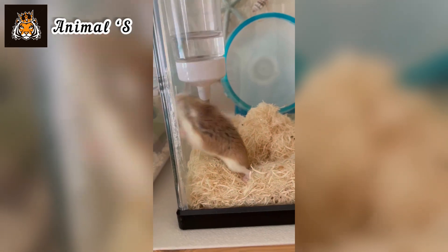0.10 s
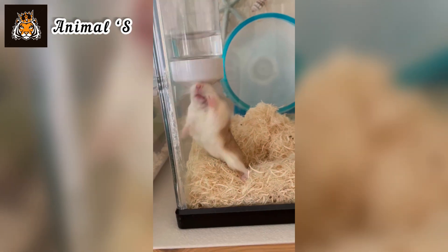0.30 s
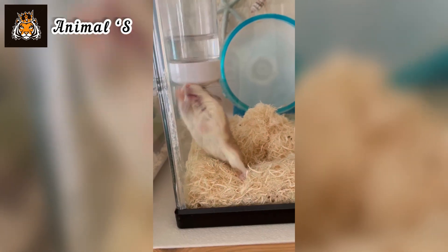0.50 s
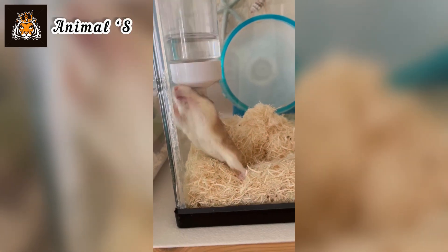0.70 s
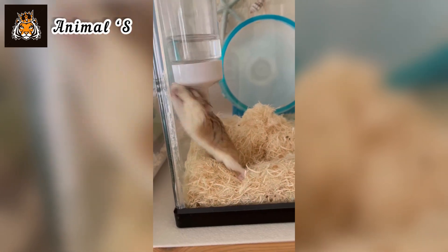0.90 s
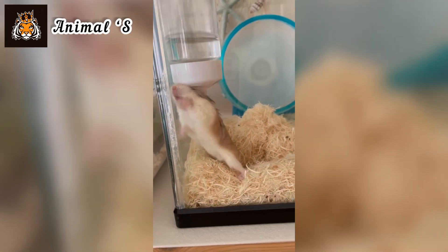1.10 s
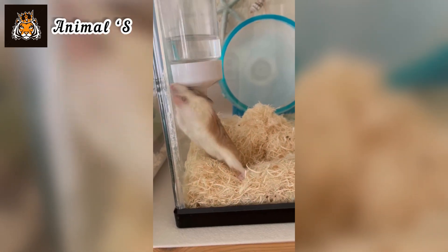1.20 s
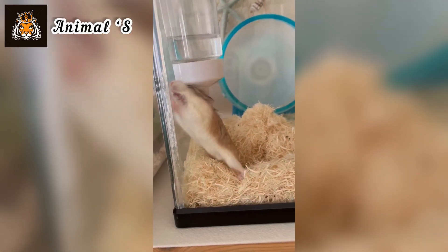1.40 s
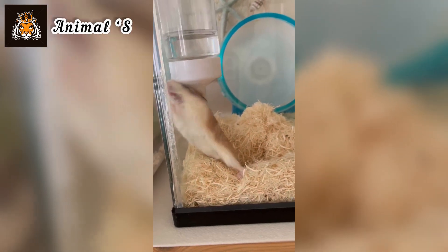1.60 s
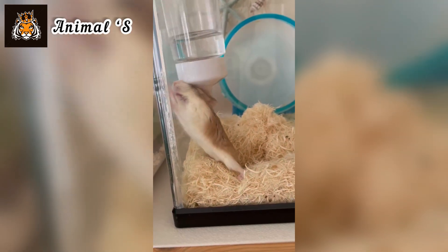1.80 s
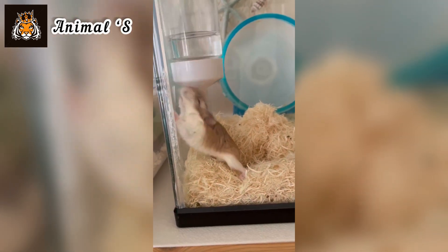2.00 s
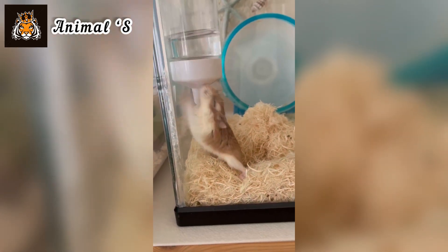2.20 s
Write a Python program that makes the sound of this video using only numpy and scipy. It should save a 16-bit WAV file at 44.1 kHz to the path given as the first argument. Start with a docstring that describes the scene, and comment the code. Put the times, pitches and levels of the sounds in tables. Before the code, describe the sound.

Hollow knocks of a hamster's water bottle on glass, with small claw clicks and crackling shavings

```python
"""A hamster stands at the water bottle in a glass tank, close to the microphone in a small quiet room.
A low hum and rumble lie beneath throughout. After a faint crackle of wood shavings and a tiny click,
paws tap the wall and the bottle knocks loudest, ringing the pane and booming through the tank.
Weaker knocks follow after one second and towards the end; between them come lighter taps, clicks of
claws and spout, and crackling shavings. Ringing modes make knocks and taps; shaped noise the rest."""
import sys
import numpy as np
from scipy import signal
from scipy.fft import rfft, irfft
from scipy.io import wavfile

SR = 44100
rng = np.random.default_rng(int(sys.argv[2]) if len(sys.argv) > 2 else 0)


def bounce(signal):
    """Save signal as a 16-bit WAV file at the path given by the first command-line argument."""
    frames = np.transpose(np.atleast_2d(signal))
    limited = np.clip(frames, -1, 1)
    pcm = np.round(limited * 32767).astype(np.int16)
    wavfile.write(sys.argv[1], SR, pcm)


N = 97020
T = np.arange(N) / SR
FREQ = np.maximum(np.arange(N + 1) * SR / (2 * N), 1)  # Hz, for spectra of 2 N samples
LEFT_RIGHT = np.array([[1], [-1]])  # a side signal is opposite in the two channels


def undb(db):
    """Decibels to gain."""
    return 10 ** (np.asarray(db) / 20)


def peak(x):
    """Scale to a peak of 1."""
    return x / np.abs(x).max()


def unit(x):
    """Scale to an rms of 1."""
    return x / x.std()


def noise():
    """White noise."""
    return rng.standard_normal(N)


def decay_db(t60_s):
    """Steady fade in dB, reaching -60 after t60_s."""
    return -60 * T / t60_s


def curve(points):
    """Levels in dB at every frequency, from (Hz, dB) points joined on a log frequency axis."""
    hz, db = np.array(points, float).T
    return np.interp(np.log(FREQ), np.log(hz), db)


def through(x, response):
    """Filter by a frequency response."""
    return irfft(rfft(x, 2 * N) * response)[..., :N]


def colour(x, db):
    """Causal minimum-phase filter with the given level at every frequency."""
    cepstrum = irfft(np.log(undb(db)))
    # folding the cepstrum forward in time makes the filter causal
    cepstrum[1:N] *= 2
    cepstrum[N + 1:] = 0
    return through(x, np.exp(rfft(cepstrum)))


def soften(x, hz):
    """Two-pole low-pass."""
    b, a = signal.butter(2, hz, fs=SR)
    return signal.lfilter(b, a, x + 1e-18)  # the tiny offset avoids slow denormal numbers


def ring(modes):
    """Free ringing of (Hz, dB, t60) modes: a sum of decaying sines."""
    return sum(undb(db) * np.sin(2 * np.pi * hz * T) * undb(decay_db(t60)) for hz, db, t60 in modes)


def add(out, start_s, x):
    """Mix a sound in from its start time."""
    i = int(start_s * SR)
    out[i:] += x[:N - i]


def bottle_knocks():
    """A knock rings the pane, whose low bending waves arrive last, and makes the whole tank boom."""
    # knocks of the bottle: start_s, level_db, contact_cutoff_hz, damping by the leaning body [dB per s]
    knocks = [(0.2029, -5, 6950, 12), (0.2512, -23, 7040, 23), (0.2956, -26, 1300, 71),
              (1.0252, -16.5, 4000, 16), (1.069, -19, 227, 54), (1.5353, -20, 3470, 38),
              (1.9053, -19, 3500, 26), (1.976, -32.5, 1000, 26)]
    # deepest strong note of the pane, before the low cut: pitch_hz, level_db, t60_s
    deep_note = (173, -5.5, .41)
    # other modes of bottle and pane, before the body damps them: pitch_hz, level_db, t60_s
    pane_modes = [(133, -16.5, 0.56), (190.1, -1, 0.23), (230.5, -18, 0.42), (322.6, -14, 0.24),
                  (373, -22.5, 0.37), (363, 0.5, 0.033), (438, -16, 0.16), (493, -24.5, 0.19),
                  (531.6, -16, 0.12), (620, 3, 0.0091), (671, -13, 0.04), (765, -19.5, 0.13),
                  (839, -22, 0.16), (1648, -18.5, 0.054), (2204, -14.5, 0.013), (2373, -24, 0.042)]
    # how well the pane radiates the upper notes: freq_hz, level_db
    radiation = [(950, 5), (1350, -7.5), (1900, 2.5), (2400, -1), (3200, -7.5), (4200, -8), (8000, -28)]
    # boom of the tank's many weak, crowded modes: freq_hz, level [dB per Hz]
    boom_spectrum = [(70, -25.5), (140, -2), (260, -4.5), (800, -9.5), (1300, -18.5), (3000, -54)]
    boom_db, boom_rise_s, boom_t60_s = -19, .012, 0.25
    bend_delay_s = 0.002217  # at 1 kHz, longer for lower notes

    low_cut = signal.butter(4, 205, "high", fs=SR, output="sos")  # Hz; the pane radiates little bass
    bend = np.exp(-4j * np.pi * bend_delay_s * np.sqrt(1000 * FREQ))
    swell = undb(boom_db + decay_db(boom_t60_s)) * np.minimum(T / boom_rise_s, 1)
    out = np.zeros(N)
    for start_s, db, cutoff_hz, damping in knocks:
        ringing = ring(vary_blow([deep_note] + pane_modes))
        radiated = colour(signal.sosfilt(low_cut, ringing), curve(radiation))
        blow = -peak(through(radiated, bend))
        boom = swell * unit(through(noise(), undb(curve(boom_spectrum))))
        add(out, start_s, undb(db - damping * T) * soften(blow + boom, cutoff_hz))
    return out


def vary_blow(modes):
    """The same modes, a little shifted in pitch and level by where the blow lands."""
    detune_share, scatter_db = .009, 1.5
    chance = rng.standard_normal((len(modes), 2))
    return [(hz * (1 + detune_share * a), db + scatter_db * b, t60)
            for (hz, db, t60), (a, b) in zip(modes, chance)]


def paw_taps():
    """A tap rings the wall with random mode polarities and scuffs it; each has its own pitch band."""
    # paw taps: start_s, rms_db of the first 20 ms, centre_hz, reach either side [octaves], scuff_db
    taps = [(0.1952, -33.5, 1066, 2.35, 13.5), (0.2046, -28, 1390, 1.43, 3.5), (.213, -27.5, 788, 0.3, 24),
            (.252, -31.5, 890, 1.11, 7), (0.2982, -43, 477, 0.73, -10), (0.4489, -43.5, 397, 1.12, 2),
            (.459, -39, 168, 0.89, 11), (0.477, -42.5, 173, 0.71, 16.5), (0.67, -44, 620, 1.66, -9),
            (0.9177, -52, 980, 0.52, 6), (0.995, -43, 540, 1.58, -2), (1.241, -57.5, 420, 2, 1),
            (1.394, -60, 830, 0.5, 12), (1.517, -47.5, 620, 0.87, -5), (1.634, -46.5, 733, 0.84, 11),
            (1.784, -59, 830, 0.26, 1), (1.838, -39.5, 550, 1.6, -2), (2.002, -43, 756, 0.71, 5),
            (2.026, -45, 760, 0.58, -3), (2.044, -48.5, 303, 1.27, 14), (2.184, -48.5, 289, 1.04, 6)]
    # modes of the tapped wall, before each tap's band and level: pitch_hz, level_db, t60_s
    wall_modes = [(132, -3.5, 0.61), (175.3, 5, 0.3), (231.8, -2, 0.26), (332.5, 7, 0.091),
                  (409.3, 6.5, 0.13), (500, 4.5, 0.15), (667.3, 2.5, 0.046), (720.6, 4.5, 0.074),
                  (941.5, 0.5, 0.088), (1142, 4.5, 0.07), (1296, -10.5, 0.22), (1610, -4, 0.088),
                  (2550, -13, .08)]
    contact_db, contact_t60_s = 4, 0.032  # the first touch
    scuff_t60_s, scuff_cutoff_hz = 0.1, 1296

    modes = np.array([ring([mode]) for mode in wall_modes])
    out = np.zeros(N)
    for start_s, db, centre_hz, octaves, scuff_db in taps:
        wall = rng.choice([-1, 1], len(modes)) @ modes
        contact = undb(contact_db + decay_db(contact_t60_s))
        scuff = undb(scuff_db + decay_db(scuff_t60_s))
        struck = wall + (contact + scuff) * unit(soften(noise(), scuff_cutoff_hz))
        edges_hz = [centre_hz / 2 ** octaves, centre_hz * 2 ** octaves]
        tap = signal.sosfilt(signal.butter(3, edges_hz, "band", fs=SR, output="sos"), struck)
        add(out, start_s, undb(db) * tap / tap[T < .02].std())
    return out


def claw_and_spout_clicks():
    """Hard little contacts, each a bright burst of noise that dies within milliseconds."""
    # sharp clicks of claws and spout: start_s, peak_db
    click_list = [(0.138, -62.5), (.2055, -25), (0.2516, -34.5), (0.6453, -57.5), (1.027, -47),
                  (1.234, -45.5), (1.336, -55.5), (1.566, -46), (1.7027, -56), (1.7255, -52), (1.9376, -41)]
    low_cut_hz, top_cut_hz, t60_s = 3000, 7500, 0.012

    b, a = signal.butter(2, low_cut_hz, "high", fs=SR)
    out = np.zeros(N)
    for start_s, db in click_list:
        bright = soften(signal.lfilter(b, a, noise()), top_cut_hz)
        add(out, start_s, undb(db) * peak(bright * undb(decay_db(t60_s))))
    return out


def shavings():
    """Each shift of weight lets off a short shower of snaps with its own colour, left and right."""
    # crackles in the shavings: start_s, level_db, decay to 1/e [s], dull part against crisp [dB]
    crackles = [(.118, -77, 0.059, -6), (0.2003, -42, 0.027, -24), (0.262, -41.5, .026, 1),
                (0.448, -71, 0.017, 8.5), (.51, -89.5, 0.24, 0), (0.673, -60, 0.032, -2),
                (.722, -67, 0.021, 2), (.802, -64, 0.027, 6), (.821, -67.5, .0085, 6.5),
                (0.879, -70, 0.0075, 3), (.973, -72, 0.015, 8), (1, -60.5, 0.029, 1.5),
                (1.027, -55, 0.033, -3), (1.067, -60.5, 0.039, 7.5), (1.229, -55.5, 0.032, 7.5),
                (1.334, -62.5, 0.023, 2), (1.388, -63.5, 0.0082, 7.5), (1.492, -73, 0.044, 9),
                (1.538, -58.5, .015, 2.5), (1.56, -60.5, 0.041, 2.5), (1.719, -65, 0.023, .5),
                (1.741, -66.5, 0.016, 5), (1.779, -78, .014, 17.5), (1.824, -64.5, 0.036, 7),
                (1.841, -56, 0.016, 0), (1.904, -57, 0.042, 2), (1.93, -60.5, 0.037, -5)]
    # crisp part of a crackle: freq_hz, level [dB per Hz]
    crisp_spectrum = [(1000, -15.5), (2500, 4.5), (3900, -0.5), (4700, 0), (5500, 6.5), (6500, -5),
                      (8500, 0.5), (12500, -5.5), (15000, -13.5)]
    # dull part of a crackle: freq_hz, level [dB per Hz]
    dull_spectrum = [(300, 5), (700, 6), (1400, 3), (2500, 1), (4000, 0), (8000, -49)]
    side_db, rise_s = -12.5, 0.0056

    grains = snaps() + undb(side_db) * LEFT_RIGHT * snaps()
    crisp = unit(colour(grains, curve(crisp_spectrum)))
    dull = unit(colour(grains, curve(dull_spectrum)))
    out = np.zeros((2, N))
    for start_s, db, decay_s, dull_db in crackles:
        rise = np.clip((T - start_s) / rise_s, 0, 1)
        fade = np.exp(-np.maximum(T - start_s - rise_s, 0) / decay_s)
        out += bend_chips(undb(db) * rise * fade * (crisp + undb(dull_db) * dull))
    return out


def snaps():
    """Dense tiny snaps at random moments, a few of them much stronger."""
    snaps_per_s, spread_db = 3500, 2.5
    polarity = rng.choice([-1, 1], N)
    happens = rng.random(N) < snaps_per_s / SR
    strength = undb(spread_db * np.minimum(rng.exponential(size=N), 4))
    return polarity * happens * strength


def bend_chips(x):
    """Colour a shower with the random peaks and dips of the chips that it bends."""
    scatter_db, spacing_hz = 3, 450
    hz = np.arange(0, SR / 2, spacing_hz)
    gain = undb(np.interp(FREQ, hz, scatter_db * rng.standard_normal(len(hz))))
    return through(x, gain / np.sqrt(np.mean(gain ** 2)))


def room(x):
    """Short diffuse echo of tank and room: coloured noise that fades after a small gap."""
    # colour of the echo: freq_hz, level_db
    echo_colour = [(100, -2), (300, -14), (700, -8.5), (1500, -15.5), (5000, -11.5), (15000, -17.5)]
    t60_s, gap_s = 0.2, 0.0049
    fade = (T > gap_s) * undb(decay_db(t60_s))
    fade = fade / np.sqrt(np.sum(fade ** 2))  # unit energy
    echo = colour(spread(noise() * fade, noise() * fade), curve(echo_colour))
    return x + through(x, rfft(echo, 2 * N))


def spread(mid, side):
    """Left and right: alike in the bass, wider in the treble."""
    # side share of the sound: freq_hz, level_db
    side_share = [(100, -56), (300, -16.5), (700, -3.5), (1500, -6), (5000, -1.5), (15000, -5.5)]
    return mid + LEFT_RIGHT * colour(side, curve(side_share))


def background():
    """Low room rumble of shaped noise, with a faint hum as a steady sine."""
    # spectrum of the rumble: freq_hz, level [dB per Hz]
    rumble_spectrum = [(20, -93), (35, -9.5), (55, -0.5), (90, 1.5), (125, -6), (180, -8), (260, -9.5),
                       (500, -14.5), (900, -22.5), (1600, -32.5), (3000, -37), (4200, -49), (8000, -51.5),
                       (13000, -47.5), (15000, -62)]
    rumble_db, hum_hz, hum_db = -56.5, 86, -64  # rms levels
    rumble = unit(through(spread(noise(), noise()), undb(curve(rumble_spectrum))))
    hum = unit(np.sin(2 * np.pi * (hum_hz * T + rng.random())))
    return undb(rumble_db) * rumble + undb(hum_db) * hum


def scene():
    """Bottle, paws, clicks and shavings in the room, over the background."""
    sources = bottle_knocks() + paw_taps() + claw_and_spout_clicks() + shavings()
    return room(sources) + background()


def record(dry):
    """The microphone has a narrow notch in the treble; the top is cut."""
    notch_hz, notch_width_hz, notch_db, top_hz = 10020, 960, -18, 15600
    notch = notch_db * np.exp(-((FREQ - notch_hz) / notch_width_hz) ** 2)
    top_cut = signal.ellip(8, .2, 70, top_hz, fs=SR, output="sos")  # steep low-pass
    return signal.sosfilt(top_cut, colour(dry, notch))


dry = scene()
out = record(dry)
bounce(out)
```